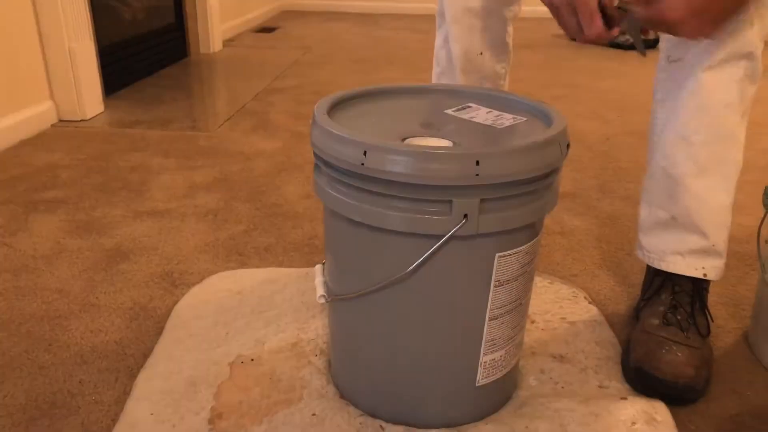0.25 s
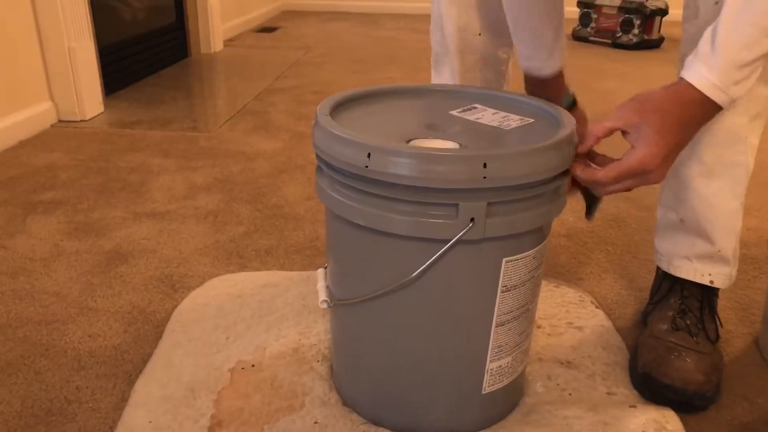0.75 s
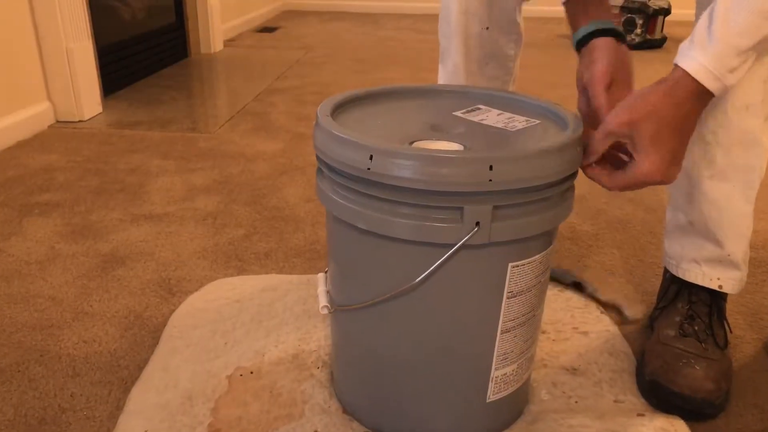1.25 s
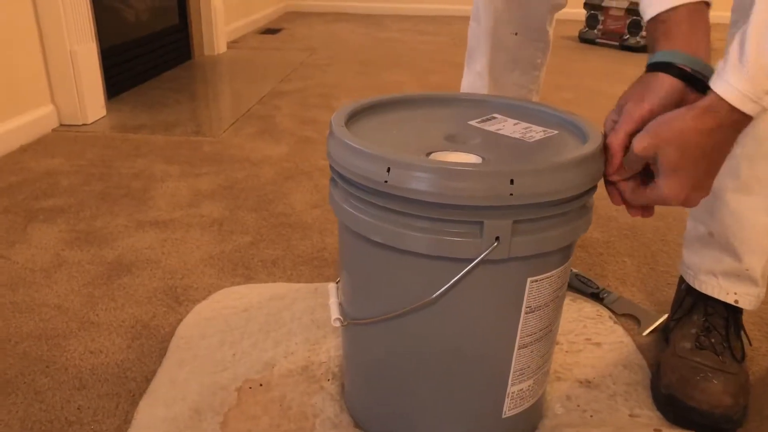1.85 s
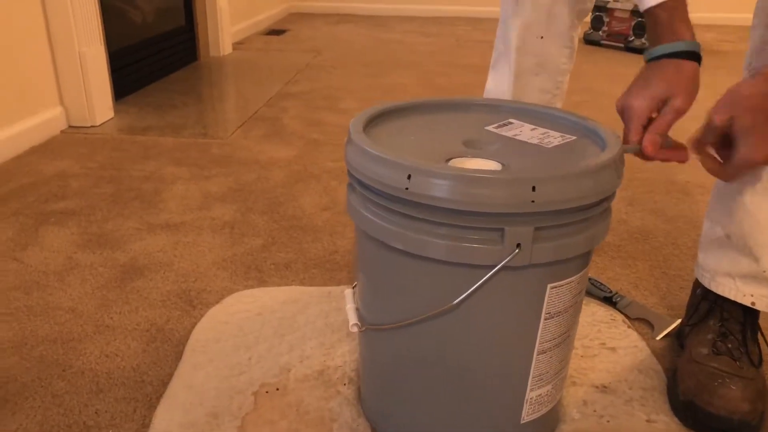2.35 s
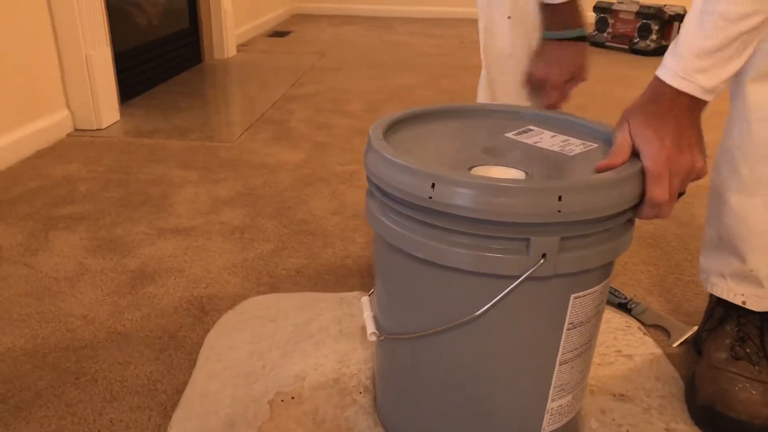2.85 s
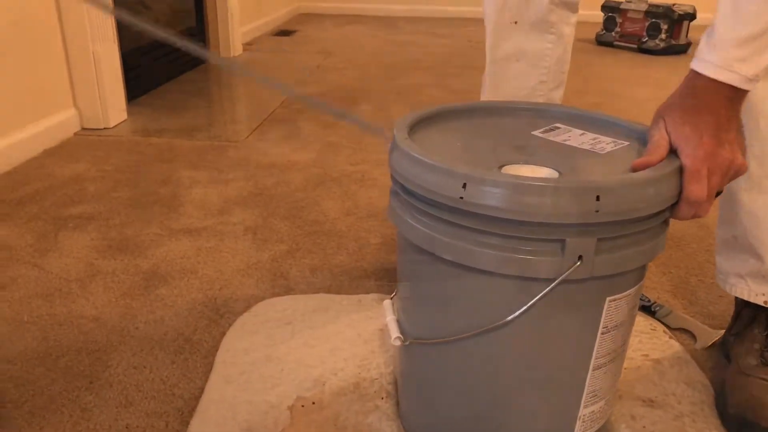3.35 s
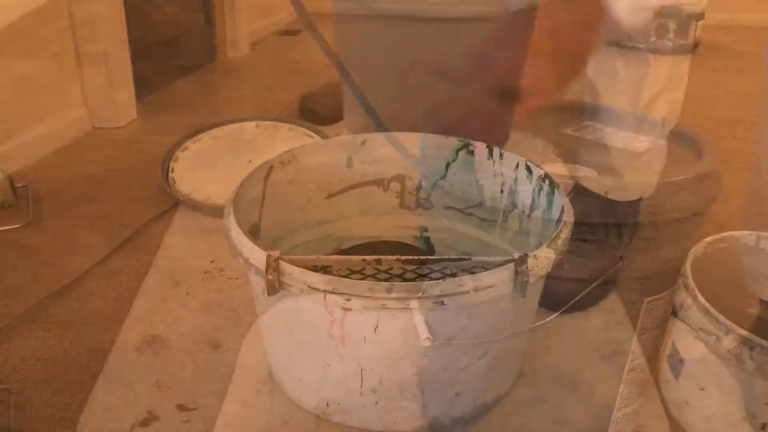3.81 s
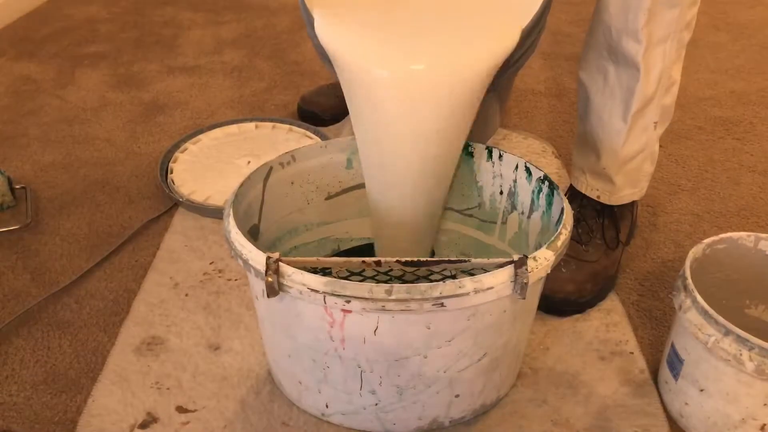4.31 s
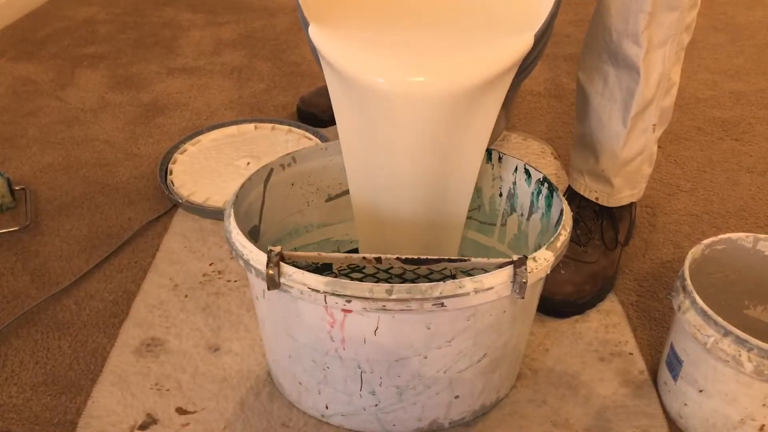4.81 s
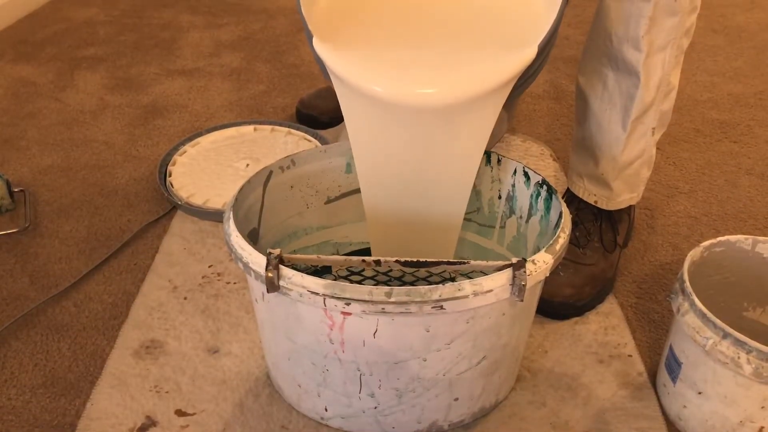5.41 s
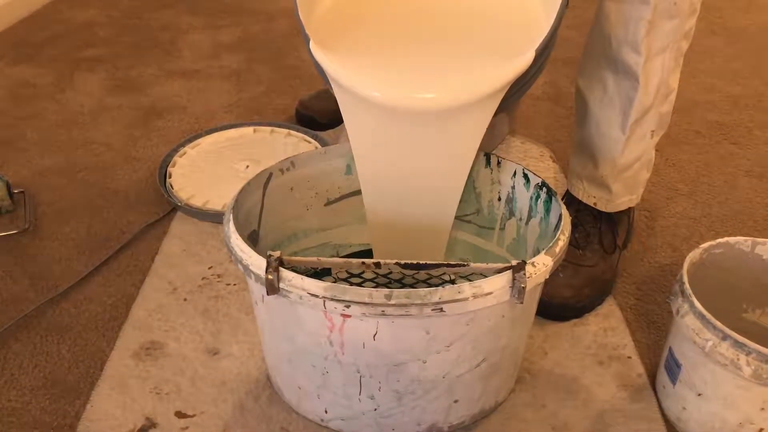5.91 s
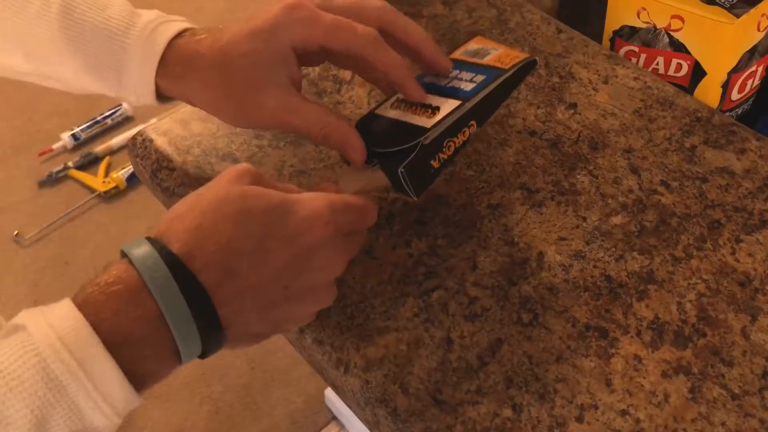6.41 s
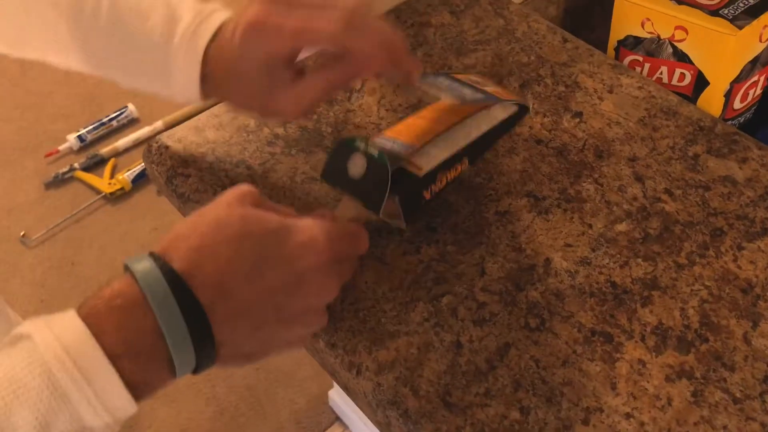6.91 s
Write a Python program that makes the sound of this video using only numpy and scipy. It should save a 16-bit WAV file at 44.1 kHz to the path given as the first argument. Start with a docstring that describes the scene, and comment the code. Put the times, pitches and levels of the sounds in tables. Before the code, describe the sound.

Faint metallic clinks and soft carpet thuds, then four sharp cracking pulls on a hollow plastic lid, two wet paint slaps, tiny pops and a carton unzipping.

```python
"""Paint bucket and carton

A scraper clinks, thuds on carpet and bounces; a bucket lid's plastic tear strip rips off in four pulls.
Thick paint slaps into a pail and bubbles pop; last, a carton's perforated flap is thumbed open.
Blows are noise bursts through body responses, rubbing and ripping random grains, rim and hollow dying sines.
Three filtered-noise airs lie behind, the first two with hums: lounge, fan at the pouring spot, kitchen.
"""
import sys
import numpy as np
from scipy import signal
from scipy.fft import rfft, irfft
from scipy.io import wavfile

SR = 44100
rng = np.random.default_rng(int(sys.argv[2]) if len(sys.argv) > 2 else 0)


def pcm_store(signal):
    """Save signal as 16-bit PCM."""
    levels = np.round(np.clip(np.atleast_2d(signal), -1, 1) * 32767)
    wavfile.write(sys.argv[1], SR, levels.astype(np.int16).T)


N = 315756
TIME_S = np.arange(N) / SR
SIZE = 8192  # FFT size in samples: each rattle burst is this long, each response half as long
HZ = np.maximum(np.arange(SIZE // 2 + 1) * SR / SIZE, 1)

# Air spectra of the three places. Each row: frequency in Hz, density in dB per Hz.
LOUNGE_AIR = [(25, -16), (55, -1), (80, -6.5), (130, -5.5), (290, -8.5), (450, -10), (700, -18.5),
              (1400, -26), (3300, -30), (7000, -36.5), (16000, -39.5)]
FAN_AIR = [(15, -70.5), (25, -23.5), (97, -18), (137, -18), (185, -14.5), (317, -16.5), (476, -4),
           (531, -20.5), (607, -11.5), (677, -21), (775, -15.5), (1400, -30), (3430, -37), (3820, -36.5),
           (16000, -43)]
KITCHEN_AIR = [(15, -63), (25, -39), (49, -8), (206, -18), (309, -5.5), (354, -18.5), (516, -15),
               (734, -26), (2350, -32.5), (3160, -36), (3820, -29.5), (16000, -47.5)]
LOUNGE_LEVEL_DB, FAN_LEVEL_DB, KITCHEN_LEVEL_DB = -59.2, -61.8, -64.5
# Duct and fan resonances. Each row: frequency in Hz, width in Hz, level in dB.
DUCT_HUMS = [(105, 5.5, -70.5), (201, 14, -66), (300, 18, -61.5)]
FAN_HUMS = [(108.5, 3.3, -72.5), (474, 8.2, -71.5), (764, 30, -77.5), (3440, 83, -87)]
# Room decay. Each row: frequency in Hz, T60 in seconds.
ROOM_T60_S = [(100, 0.31), (400, 0.9), (1000, 0.62), (2800, 0.66), (7000, 0.45), (15000, 0.22)]

# Sleeves and hands brushing. Each row: middle in s, half length in s, level in dB, tilt in dB per octave.
BRUSHES = [(.02, 0.048, -58.5, -6.5), (.21, 0.056, -64, 5.5), (.83, 0.17, -68, -0.5),
           (1.28, 0.14, -61.5, -5.5), (2.68, 0.027, -60, 0), (3.06, 0.033, -53, -1.5)]
# Cloth spectrum. Each row: frequency in Hz, density in dB per Hz.
CLOTH = [(200, -7), (800, -4.5), (1800, 1), (4000, -1.5), (8000, -6), (16000, -8)]

# Carton perforations breaking first, one by one. Each row: time in seconds, energy in dB.
TICKS = [(6.7695, -13.5), (6.8090, -15), (6.8169, -8.5), (6.8294, -16), (6.8344, -7.5), (6.8399, -7),
         (6.8663, -13), (6.8711, -10.5), (6.8846, -30), (6.8892, -6.5), (6.8968, -9), (6.9000, -6)]
# Thumb force over the closing run of breaks. Each row: time in seconds, energy of each break in dB.
UNZIP_FORCE = [(6.9136, -10), (6.9565, -1.5), (6.9785, -11)]
# Card spectrum. Each row: frequency in Hz, density in dB per Hz.
CARD = [(80, -30), (250, -18), (700, -6.5), (1300, -6.5), (2100, -7.5), (2900, 1), (4000, -1), (5400, -6),
        (8000, -4), (11000, -8.5), (16000, -12.5)]
TICK_RATTLE_MS, TICK_TILT_DB_PER_OCT, TICK_HZ = 0.9, 1.7, 3500
# Parting fibres: lag after each break, half length, level relative to the break's energy, tilt.
FIBRE_LAG_S, FIBRE_HALF_S, FIBRE_REL_DB, FIBRE_TILT_DB_PER_OCT = 0.009, 0.0043, -33, -1.04
# Fingers sliding on the carton. Each row: middle in s, half length in s, level in dB, tilt in dB per octave.
RUBS = [(6.18, 0.025, -62.5, 3), (6.2, 0.0077, -49.5, -2.5), (6.308, 0.01, -56.5, -2),
        (6.39, 0.01, -60.5, -2), (6.69, 0.021, -69, 5), (7.083, 0.018, -49.5, 0.5)]
# Finger spectrum. Each row: frequency in Hz, density in dB per Hz.
FINGERS = [(150, -12.5), (450, -8), (780, 2), (1200, -7.5), (2000, -9), (3400, -3.5), (6000, -11.5),
           (9000, -12), (16000, -20)]

# Larger bubbles bursting. Each row: time in seconds, energy in dB, rattle in ms.
POPS = [(5.2853, -34, 3), (5.3627, -35, 1.2), (5.3918, -21, 0.91), (5.4428, -18.5, 0.95),
        (5.5788, -26.5, 1.82)]
# Bubble film spectrum. Each row: frequency in Hz, density in dB per Hz.
FILM = [(300, -25), (1500, -6.5), (4000, -17), (6000, -6.5), (10000, -13.5), (16000, -17)]
# Small bubbles: time span, mean energy, median rattle.
FIZZ_START_S, FIZZ_END_S, FIZZ_DB, FIZZ_MS = 5.48, 5.78, -38.5, 1.54
# Paint gobs hitting the pail. Each row: time in s, energy in dB, tilt in dB per octave,
# rattle in ms, resonance in Hz.
SLAPS = [(4.4230, -7.5, 1, 1.26, 855), (4.4275, -7.5, -7, 8.5, 241.6), (4.5767, -10, -1, 5.5, 1557),
         (4.584, -11.5, -3.5, 9.6, 400)]
# Pail spectrum. Each row: frequency in Hz, density in dB per Hz.
PAIL = [(50, -29), (130, -2.5), (260, -2), (450, 0.5), (800, -7.5), (1400, -6), (1900, -11), (4400, -16.5),
        (6500, -25.5), (10000, -34.5), (16000, -25)]

# Scraper blade touching rim and floor. Each row: time in seconds, energy in dB, rattle in ms.
CLINKS = [(.636, -31, 5.2), (.695, -24, 8.3), (.771, -34.5, 4.9), (.9005, -22.5, 5), (1.0897, -16.5, 8.7),
          (1.1378, -15.5, 3.4), (1.2415, -24.5, 11.5), (1.300, -23, 8.9), (1.3662, -25, 2.4),
          (1.467, -36.5, 1.7), (2.54, -31, 1.5)]
# Blade sliding under the rim. Each row: middle in s, half length in s, level in dB, tilt in dB per octave.
SCRAPES = [(.907, .006, -54.5, -2), (1.072, 0.011, -60, -4)]
# Blade spectrum. Each row: frequency in Hz, density in dB per Hz.
BLADE = [(200, -11), (600, -8.5), (850, -1), (1150, -7), (1620, 2), (2100, -3.5), (2900, -3), (4500, -7),
         (8000, -15), (16000, -17)]
# Scraper ends landing on the carpet. Each row: time in seconds, energy in dB, rattle in ms, resonance in Hz.
THUDS = [(1.148, -8.5, 21, 170), (1.372, -11.5, 35, 195.7)]
# Carpet spectrum. Each row: frequency in Hz, density in dB per Hz.
CARPET = [(30, -16.5), (70, -2), (120, -1), (175, -2), (300, -6.5), (450, -18.5), (900, -35), (4000, -64)]
# Per bounce: spacing, energy loss, factor that lengthens the rattle and lowers the resonance.
BOUNCE_S, BOUNCE_LOSS_DB, BOUNCE_SOFTER = 0.055, 3.5, 1.42

# Webs of the tear strip breaking. Each row: time in seconds, energy in dB, rattle in ms.
SNAPS = [(2.0595, 3, 2.6), (2.0691, 3.5, 2.6), (2.0799, 9, 1.03), (2.09, 3.5, 1.6), (2.1248, 6.5, 2.2),
         (2.654, -26.5, 3.4), (2.723, -22, 6.4), (2.7423, 12, 2.67), (2.8336, 5, 1.2), (2.8484, 12.5, 2.56),
         (2.875, 5.5, 3), (3.1022, -11, 4.4), (3.1354, -2.5, 1.9), (3.1520, 1.5, 4.8), (3.1641, 9.5, 0.76),
         (3.1688, 1.5, 0.59), (3.2010, 5.5, 2.3), (3.2346, -0.5, 3.2), (3.2532, 5.5, 3.1),
         (3.4309, -2, 0.64), (3.4359, 6.5, 0.98), (3.4511, 3, 1.6)]
# Strip tearing alongside and after the snaps. Each row: start in s, end in s, level in dB,
# tilt in dB per octave, resonance in Hz.
RIPS = [(2.092, 2.125, -20.5, 0.5, 1700), (2.751, 2.885, -23.5, 0.3, 2291), (3.159, 3.225, -29, -4, 795),
        (3.441, 3.499, -32.5, -1.9, 3500), (3.583, 3.626, -48.5, 1, 3500)]
# Lid plastic spectrum. Each row: frequency in Hz, density in dB per Hz.
PLASTIC = [(60, -27.5), (150, -18.5), (400, -9.5), (700, -9.5), (1100, -3.5), (1650, 5.5), (2400, -1.5),
           (4200, 0.5), (5600, -4), (8000, -4), (11000, -7), (16000, -12.5)]
# Lid springing back after each snap with a duller clack.
RECOIL_LAG_S, RECOIL_LOSS_DB = 0.002, 8
RECOIL_TILT_DB_PER_OCT, RECOIL_RATTLE_MS, RECOIL_HZ = -2.5, 4.4, 710
# Rim modes at the first pull, while the strip holds it taut. Each row: frequency in Hz, energy in dB,
# T60 in seconds; all are raised by RIM_GAIN_DB.
RIM_MODES = [(1250, -11, 0.58), (1295, -12, 0.21), (1424, -14, 0.21), (1543, -8, .28), (1750, -9.5, 0.38),
             (1737, -6.5, .36)]
RIM_START_S, RIM_GAIN_DB = 2.081, 4.5
# Air shut in the bucket. Each row: frequency in Hz, relative energy in dB, T60 in seconds.
HOLLOW_MODES = [(204, -1, 0.22), (285, -12.5, 0.099), (385, -6.5, 0.29)]
# Lid flexing as the strip gives. Each row: time in seconds, gain on the hollow modes in dB.
FLEXES = [(2.061, -6.5), (2.091, -8), (2.732, -5), (2.850, -6.5), (3.166, -14), (3.261, -14), (3.44, -10)]


def from_db(db):
    """Decibels to amplitude gain."""
    return 10 ** (np.asarray(db) / 20)


def unit_energy(x):
    """Scale so that the squares sum to one."""
    return x / np.sqrt(np.sum(x ** 2) + 1e-20)


def rms_one(x):
    """Scale to a mean square of one."""
    return unit_energy(x) * np.sqrt(len(x))


def at_hz(points, hz):
    """Read a table on a log-frequency axis."""
    table_hz, value = np.transpose(points)
    return np.interp(np.log(hz), np.log(table_hz), value)


def add(track, start_s, sound):
    """Mix a sound in at start_s."""
    i = max(round(start_s * SR), 0)
    track[i:i + len(sound)] += sound[:max(N - i, 0)]


def through(x, answer):
    """Convolve, keeping the length."""
    return signal.oaconvolve(x, answer)[:len(x)]


def response(spectrum, tilt_db_per_oct=0, lag_ms=0, extra_db=0):
    """Causal answer to a click; bending waves bring the highs first, 1 kHz lag_ms later."""
    tilt_db = tilt_db_per_oct * np.log2(np.maximum(HZ, 500) / 1000)
    log_gain = np.log(from_db(at_hz(spectrum, HZ) + extra_db + tilt_db))
    cepstrum = irfft(log_gain)[:SIZE // 2]
    minimum_phase = 2 * rfft(cepstrum, SIZE).imag
    phase = minimum_phase - 4 * np.pi * lag_ms * np.sqrt(HZ / 1000)
    return unit_energy(irfft(np.exp(log_gain + 1j * phase))[:SIZE // 2])


def spot(hz, peak_db, octaves, ripple_db):
    """Colour of a struck spot in dB: a main resonance among small ones that merge in the treble."""
    small = rms_one(np.convolve(rng.standard_normal(len(HZ)), signal.windows.hann(61), "same"))
    distinct = HZ / (HZ + 600) / (1 + (HZ / 7000) ** 2)
    main_db = peak_db / (1 + (np.log2(HZ / hz) / octaves) ** 2)
    return main_db + ripple_db * small * distinct


def rattle(ms, direct):
    """A first arrival, then waves criss-crossing the wall about equally strong at all pitches."""
    fade = np.exp(-(np.arange(SIZE) / (SR * ms / 1000)) ** 2 / 2)
    burst = rng.standard_normal(SIZE) * fade
    for _ in range(2):  # flatten the spectrum, fade again
        burst = irfft(np.exp(1j * np.angle(rfft(burst)))) * fade
    burst = unit_energy(burst)
    burst[0] = direct / max(ms, 1)
    return burst


def contacts(rows, cycles, even_ms, tilt_db):
    """A shorter contact rings higher and brighter: tilt_db per octave per halving below even_ms."""
    return [(s, db, tilt_db * np.log2(even_ms / ms), ms, 1000 * cycles / ms) for s, db, ms in rows]


def blows(rows, spectrum, lag_ms, peak_db, octaves, ripple_db=0, direct=0):
    """Each blow rattles through the body with its own energy, tilt and resonance."""
    out = np.zeros(N)
    for s, db, tilt_db_per_oct, ms, hz in rows:
        colour_db = spot(hz, peak_db, octaves, ripple_db)
        answer = response(spectrum, tilt_db_per_oct, lag_ms, colour_db)
        blow = signal.fftconvolve(rattle(ms, direct), answer)
        add(out, s, from_db(db) * unit_energy(blow))
    return out


def grains(count, per_s, spread_db):
    """Tiny clicks at random moments, of random sign and size; rms 1."""
    sizes = from_db(spread_db * np.clip(rng.standard_normal(count), -2, 2))
    signed = sizes * rng.choice([-1, 1], count)
    return rms_one(signed * (rng.random(count) < per_s / SR))


def friction(rows, spectrum, per_s, spread_db):
    """Strokes of fine stick and slip that swell and fade."""
    out = np.zeros(N)
    for middle_s, half_s, db, tilt_db_per_oct in rows:
        start_s = max(middle_s - 3 * half_s, 0)
        t = start_s + TIME_S[:int(6 * half_s * SR) + 2]
        swell = np.exp(-.5 * ((t - middle_s) / half_s) ** 2)
        slips = grains(len(t), per_s, spread_db) * swell
        add(out, start_s, from_db(db) * signal.fftconvolve(slips, response(spectrum, tilt_db_per_oct)))
    return out


def ringing(modes):
    """Sum of exponentially dying sines, each with the energy of its row."""
    t = TIME_S[:2 * SIZE]
    out = np.zeros(len(t))
    for hz, db, t60_s in modes:
        out += from_db(db) * unit_energy(np.sin(2 * np.pi * hz * t) * from_db(-60 * t / t60_s))
    return out


def room(x, build_s):
    """Diffuse reflections that build up briefly, then die at a rate set by frequency."""
    t, tail = TIME_S[:int(.8 * SR)], 0
    white = rng.standard_normal((2, len(t)))
    edges_hz = np.geomspace(60, 17000, 12)
    for k, band_hz in enumerate(zip(edges_hz, edges_hz[1:])):
        bandpass = signal.butter(2, band_hz, "band", fs=SR, output="sos")
        noise = signal.sosfilt(bandpass, white[k % 2])  # neighbouring bands use different noise
        t60_s = at_hz(ROOM_T60_S, np.sqrt(np.prod(band_hz)))
        tail = tail + noise * from_db(-60 * t / t60_s)
    return through(x, unit_energy(tail * (1 - np.exp(-(t / build_s) ** 2))))


def air(spectrum, level_db, hums=()):
    """Steady ventilation noise, plus noise through narrow resonances as hums."""
    out = from_db(level_db) * rms_one(through(rng.standard_normal(N), response(spectrum)))
    for hz, width_hz, db in hums:
        b, a = signal.iirpeak(hz, hz / width_hz, fs=SR)
        hum = signal.lfilter(b, a, rng.standard_normal(N + SR))[SR:]  # drop 1 s of settling
        out = out + from_db(db) * rms_one(hum)
    return out


def background():
    """Lounge air melts slowly into the fan's, which gives way at once to the kitchen's."""
    melted = np.clip((TIME_S - 3.4) / 0.57, 0, 1)
    moved = np.clip((TIME_S - 6.125) / 0.022, 0, 1)
    lounge = air(LOUNGE_AIR, LOUNGE_LEVEL_DB, DUCT_HUMS) * np.sqrt(1 - melted)
    fan = air(FAN_AIR, FAN_LEVEL_DB, FAN_HUMS) * np.sqrt(melted * (1 - moved))
    kitchen = air(KITCHEN_AIR, KITCHEN_LEVEL_DB) * np.sqrt(moved)
    return lounge + fan + kitchen


def brushing():
    """Sleeves and hands brush in soft strokes of friction."""
    return friction(BRUSHES, CLOTH, per_s=4500, spread_db=6.5)


def unzip(jitter_s, spread_db, count):
    """Evenly spaced perforations break in a nearly even run, as loud as the thumb pushes."""
    when_s, force_db = np.transpose(UNZIP_FORCE)
    times_s = np.linspace(when_s[0], when_s[-1], count)
    chance = rng.uniform(-1, 1, (count, 2))
    return [(s + jitter_s * late, np.interp(s, when_s, force_db) + spread_db * loud)
            for s, (late, loud) in zip(times_s, chance)]


def carton_flap():
    """Perforations break with similar ticks, each followed by a rustle of fibres; fingers rub."""
    breaks = TICKS + unzip(jitter_s=.0012, spread_db=4.0, count=12)
    ticks = [(s, db, TICK_TILT_DB_PER_OCT, TICK_RATTLE_MS, TICK_HZ) for s, db in breaks]
    fibres = [(s + FIBRE_LAG_S, FIBRE_HALF_S, db + FIBRE_REL_DB, FIBRE_TILT_DB_PER_OCT)
              for s, db in breaks]
    ticking = blows(ticks, CARD, lag_ms=0.33, peak_db=7.5, octaves=0.61, ripple_db=5.5)
    rustle = friction(fibres, CARD, per_s=1100, spread_db=2.5)
    return ticking + rustle + friction(RUBS, FINGERS, per_s=11000, spread_db=9.5)


def fizz(spread_db, spread_octaves, count):
    """Small bubbles of chance size and energy, one at a chance moment in each equal time slot."""
    slots = (np.arange(count) + rng.random(count)) / count
    times_s = FIZZ_START_S + (FIZZ_END_S - FIZZ_START_S) * slots
    return [(s, FIZZ_DB + spread_db * loud, FIZZ_MS * 2 ** (spread_octaves * size))
            for s, (loud, size) in zip(times_s, rng.standard_normal((count, 2)))]


def paint_bubbles():
    """Bursting films give short pops, higher and brighter the shorter they are."""
    small = fizz(spread_db=1.5, spread_octaves=0.45, count=4)
    pops = contacts(POPS + small, cycles=8.1, even_ms=1.18, tilt_db=4)
    return blows(pops, FILM, lag_ms=0.15, peak_db=16, octaves=0.58, ripple_db=7.5, direct=0.63)


def paint_slaps():
    """Gobs of paint strike the pail and excite its wall."""
    return blows(SLAPS, PAIL, lag_ms=1.646, peak_db=8.5, octaves=0.14, ripple_db=2.5, direct=0.48)


def bounces(tilt_db_per_oct, count):
    """Each landing is followed by ever weaker, longer and lower bounces."""
    return [(s + k * BOUNCE_S, db - k * BOUNCE_LOSS_DB, tilt_db_per_oct,
             ms * BOUNCE_SOFTER ** k, hz / BOUNCE_SOFTER ** k)
            for s, db, ms, hz in THUDS for k in range(count)]


def dropped_scraper():
    """The blade clinks and scrapes by stick and slip; the ends thud and bounce on the carpet."""
    touches = contacts(CLINKS, cycles=14, even_ms=4.7, tilt_db=1.5)
    clinks = blows(touches, BLADE, lag_ms=0.45, peak_db=7.0, octaves=.17, ripple_db=4.5, direct=1.3)
    scrapes = friction(SCRAPES, BLADE, per_s=1000, spread_db=3)
    landings = bounces(tilt_db_per_oct=2.5, count=4)
    return clinks + scrapes + blows(landings, CARPET, lag_ms=2.1, peak_db=7.0, octaves=0.12)


def tear_strip():
    """Webs snap and the lid recoils, the seam rips in tiny cracks; rim and enclosed air ring along."""
    recoils = [(s + RECOIL_LAG_S, db - RECOIL_LOSS_DB, RECOIL_TILT_DB_PER_OCT, RECOIL_RATTLE_MS, RECOIL_HZ)
               for s, db, _ in SNAPS]
    snaps = contacts(SNAPS, cycles=5.8, even_ms=2.7, tilt_db=3.5)
    out = blows(snaps + recoils, PLASTIC, lag_ms=.8, peak_db=4.0, octaves=0.12, ripple_db=5.0, direct=1.6)
    for start_s, end_s, db, tilt_db_per_oct, hz in RIPS:
        seam = grains(int((end_s - start_s) * SR), per_s=4500, spread_db=5)
        colour_db = spot(hz, peak_db=4.5, octaves=0.12, ripple_db=4.0)
        answer = response(PLASTIC, tilt_db_per_oct, lag_ms=.9, extra_db=colour_db)
        add(out, start_s, from_db(db) * signal.fftconvolve(seam, answer))
    add(out, RIM_START_S, from_db(RIM_GAIN_DB) * ringing(RIM_MODES))
    boom = ringing(HOLLOW_MODES) * (1 - np.exp(-TIME_S[:2 * SIZE] / 0.005))  # 5 ms onset
    for s, db in FLEXES:
        add(out, s, from_db(db) * boom)
    return out


def scene():
    """All sources over the background; all but the brushing also feed the room."""
    hands = brushing()
    carton = carton_flap()
    bubbles = paint_bubbles()
    slaps = paint_slaps()
    scraper = dropped_scraper()
    lid = tear_strip()
    sent = from_db(-10) * lid + from_db(-10.5) * scraper + from_db(-14) * carton
    sent += from_db(-12.5) * (slaps + bubbles)
    direct = lid + scraper + hands + slaps + bubbles + carton
    return (direct + room(sent, build_s=0.0035) + background())[None]


def record(dry):
    """The microphone sheds the deepest bass, high peaks are rounded, the top is cut steeply."""
    thin = signal.sosfilt(signal.butter(2, 38, "high", fs=SR, output="sos"), dry)
    rounded = thin / (1 + (thin / .85) ** 6) ** (1 / 6)
    lowpass = signal.ellip(10, .2, 80, 16100, fs=SR, output="sos")
    return signal.sosfilt(lowpass, rounded)


dry = scene()
out = record(dry)
pcm_store(out)
```